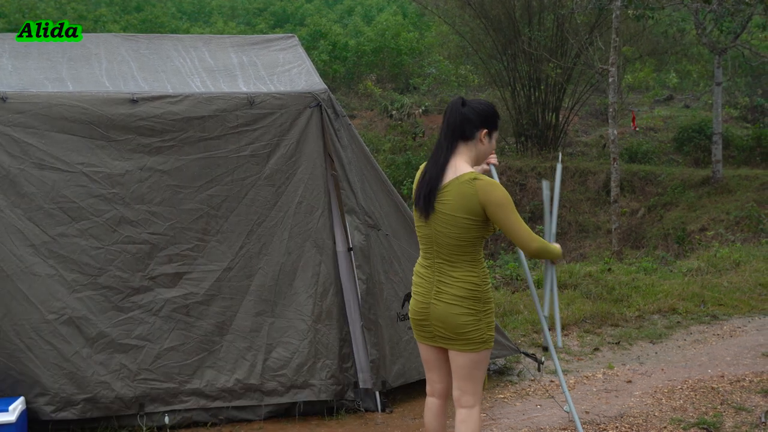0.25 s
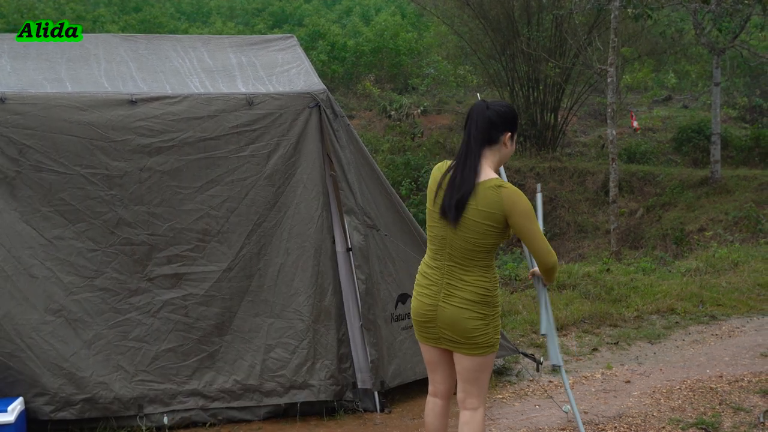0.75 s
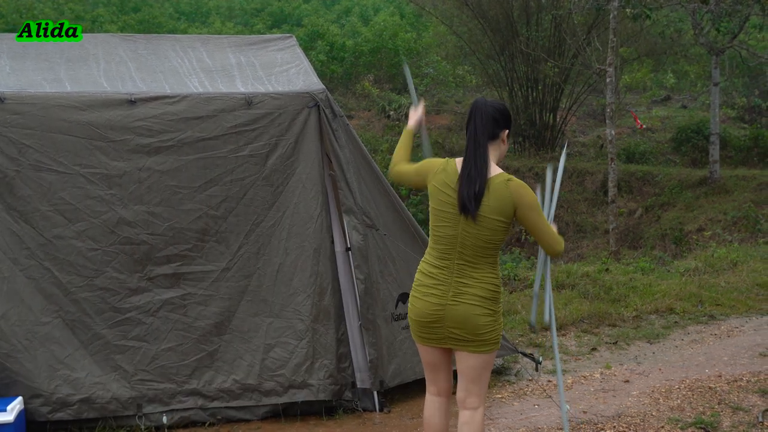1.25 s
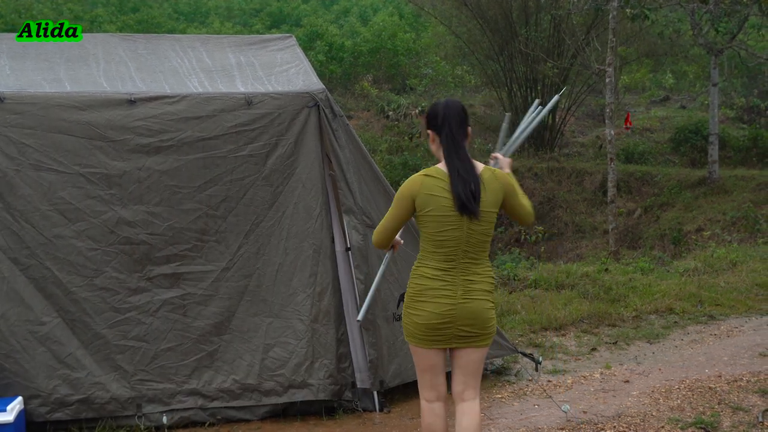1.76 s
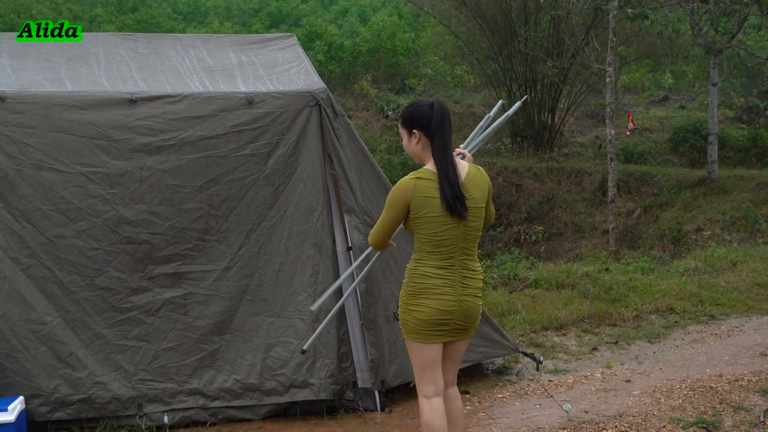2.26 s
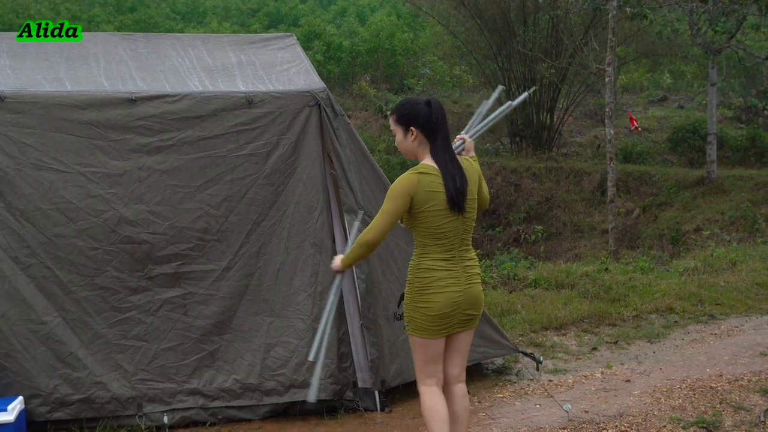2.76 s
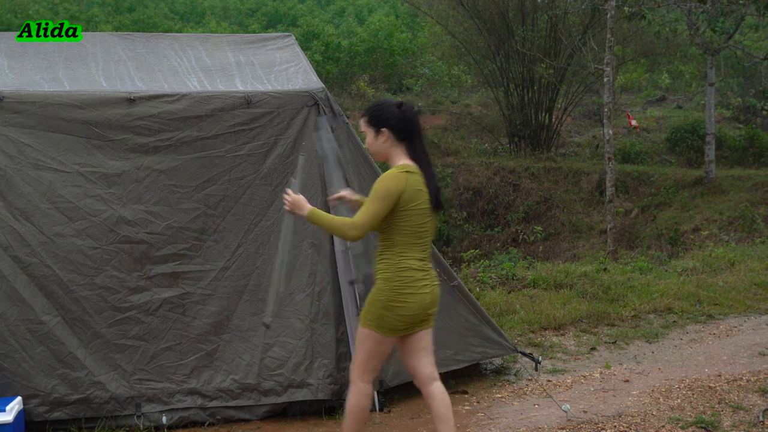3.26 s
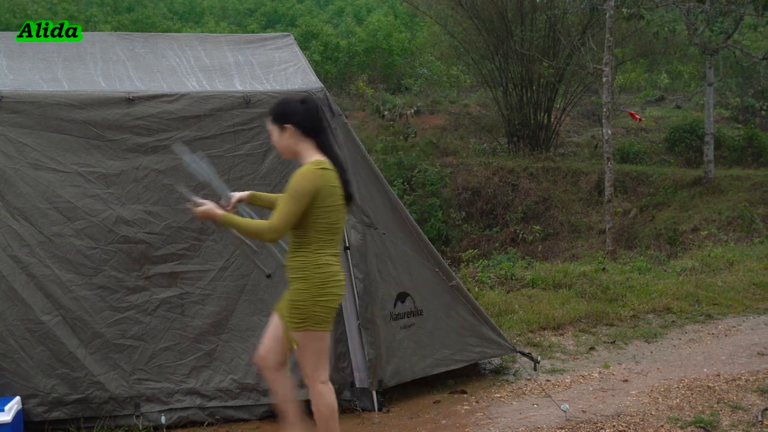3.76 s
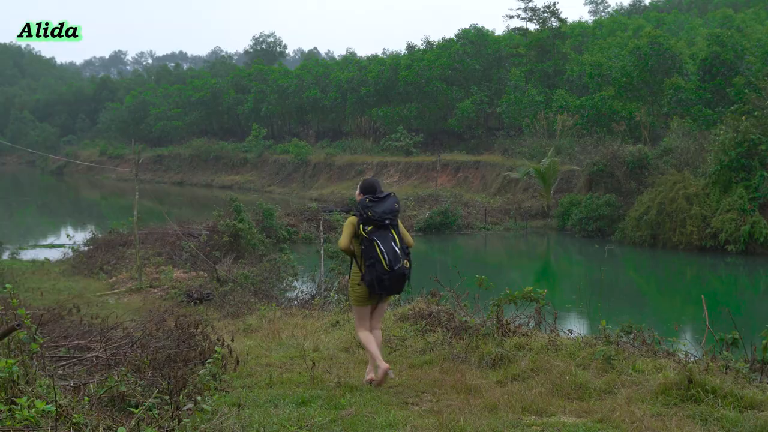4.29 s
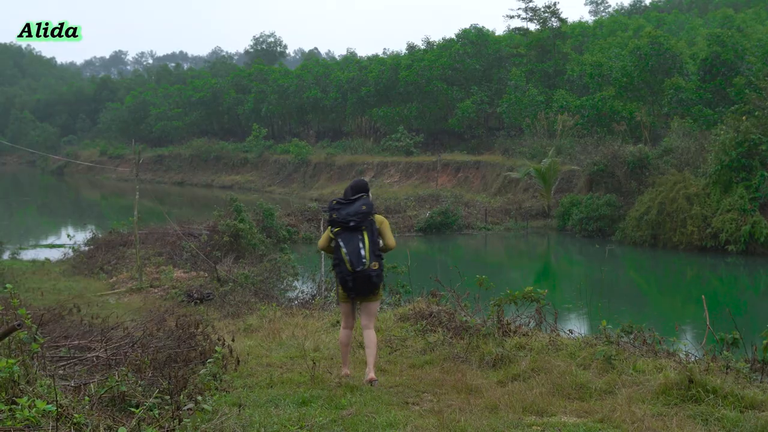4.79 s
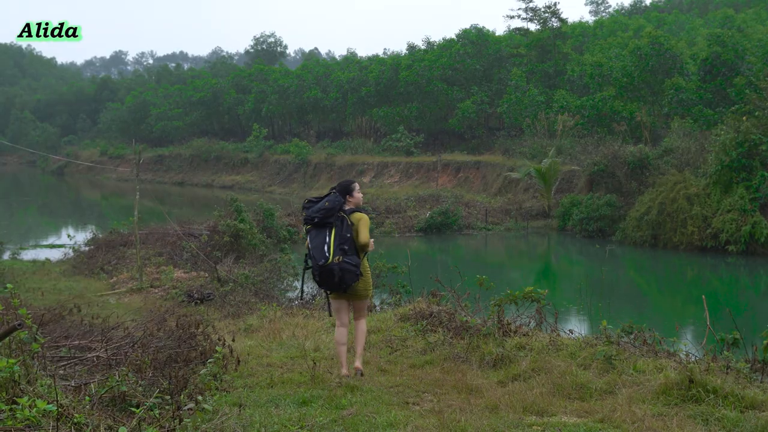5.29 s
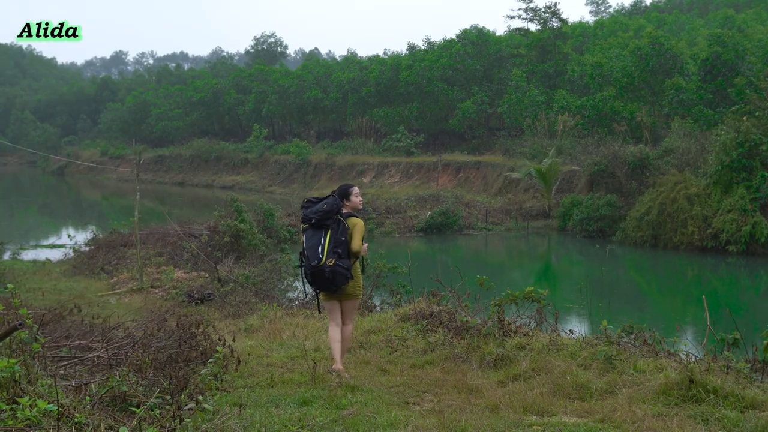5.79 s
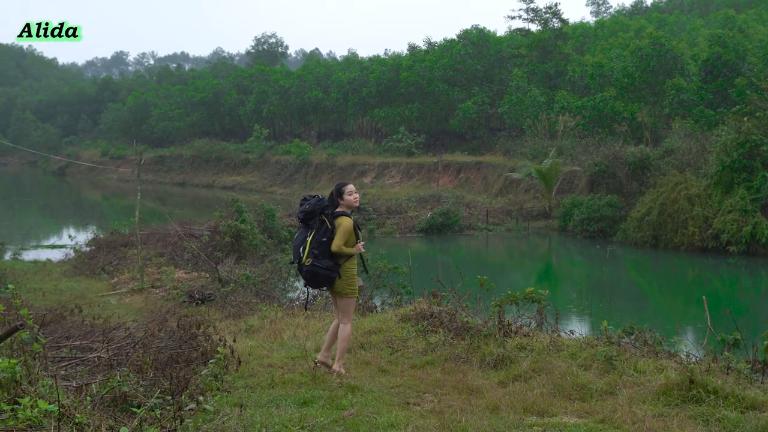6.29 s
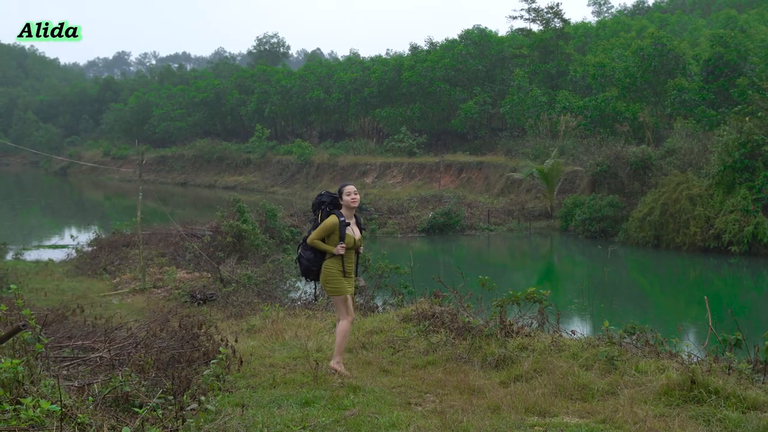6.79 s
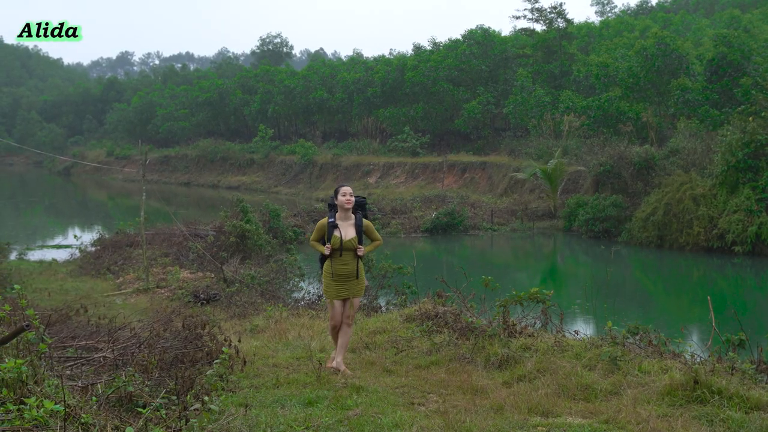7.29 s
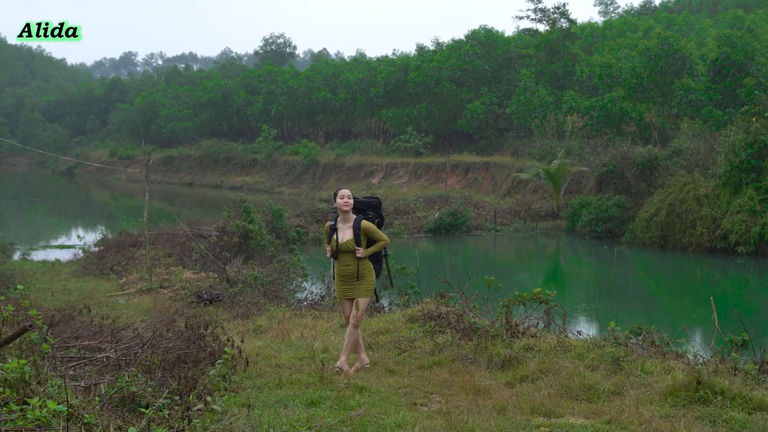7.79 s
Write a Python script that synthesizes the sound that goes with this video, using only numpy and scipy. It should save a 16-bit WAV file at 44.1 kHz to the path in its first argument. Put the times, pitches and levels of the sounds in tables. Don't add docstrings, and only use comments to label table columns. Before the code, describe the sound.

Bright, quickly damped clacks of hollow metal tubes over fine rain and a faint insect tone, then only soft footsteps and distant bird whistles.

```python
import sys
import numpy as np
from scipy import signal
from scipy.fft import rfft, irfft, next_fast_len
from scipy.io import wavfile

SR = 44100
rng = np.random.default_rng(int(sys.argv[2]) if len(sys.argv) > 2 else 0)


def natural_amplitude(level_db):
    exponent = np.asarray(level_db, float) / 20
    return 10 ** exponent


def output_pcm(signal):
    pcm = np.clip(np.atleast_2d(signal).T, -1, 1) * 32767
    wavfile.write(sys.argv[1], SR, np.round(pcm).astype(np.int16))


N = 354996


def rms_one(x):
    return x / np.sqrt(np.mean(x ** 2) + 1e-20)


def at_hz(points, hz):
    points_hz, values = np.transpose(points)
    return np.interp(np.log(hz), np.log(points_hz), values)


def drift(rate):
    r = np.exp(-80 * np.pi * rate / SR)
    slow = signal.lfilter([1], [1, -2 * r, r * r], rng.standard_normal(N // 40 + 2002))[2000:]
    return np.interp(np.arange(N) / 40, np.arange(len(slow)), rms_one(slow))


def resonate(x, peaks):
    out = 0
    for k, (hz, width, db) in enumerate(peaks):
        r = np.exp(-np.pi * width / SR)
        a = [1, -2 * r * np.cos(2 * np.pi * hz / SR), r * r]
        b = [(1 - r * r) / 2, 0, (r * r - 1) / 2]
        out = out + (-1) ** k * natural_amplitude(db) * signal.lfilter(b, a, x)
    return out


def coloured(x, db_at):
    hz = np.maximum(np.arange(x.shape[-1] // 2 + 1) * SR / x.shape[-1], 20)
    return irfft(rfft(x) * natural_amplitude(db_at(hz)), x.shape[-1])


def filtered(x, order, hz, kind):
    return signal.sosfilt(signal.butter(order, hz, kind, fs=SR, output="sos"), x)


def pair(alike, size):
    mid, side = rng.standard_normal((2, size))
    return np.sqrt((1 + alike) / 2) * mid + np.sqrt((1 - alike) / 2) * side * [[1], [-1]]


def add(out, sound, s, pan_db):
    i = round(s * SR)
    placed = sound * natural_amplitude([[pan_db / 2], [-pan_db / 2]])
    out[:, i:i + sound.shape[-1]] += placed[:, :N - i]


def damped(t, t60, after_s, held_t60=0.029):
    return natural_amplitude(-60 * t / t60 - 60 * np.maximum(t - after_s, 0) / held_t60)


# (time [s], left over right [dB])
PLACE = [(0, 1.5), (.7, -2.5), (.95, -2), (1.1, 0), (2.3, 0.5), (2.8, 1), (3.4, 1.5), (4.2, 3.5)]


def carried(s):
    return np.interp(s, *np.transpose(PLACE))


# (frequency [Hz], level [dB], free t60 [s])
LONG_TUBE = [(756, -23.5, 0.13), (1483.4, -6, 0.21), (2436, -4, 0.13), (3476, -3.5, 0.12),
             (4715, -9.5, 0.19), (6200, -13.5, 0.14), (7510, -6.5, 0.11), (9460, -6, 0.04),
             (10780, -11.5, 0.14)]
MIDDLE_TUBE = [(1670, -22, 0.36), (2530, -1.5, 0.069), (3960, -13.5, 0.12), (5120, -12.5, 0.45),
               (7200, -24, 0.22)]
SHORT_TUBE = [(1822, -9, 0.25), (2759, -8, 0.24), (2834, -19.5, 0.16), (5293, -8.5, 0.5), (8320, -15, 0.14)]
LOWEST_ORDERS = [2, 3, 4]
# (until time [s], contact point [share of length], middle tube level [dB],
# short tube level [dB], brightness [dB per octave])
GRIPS = [(.6, 0.228, -1, -5, 1.8), (.77, 0.393, 1, -12, -3.5), (.845, 0.37, 5.5, -17, -1),
         (.9, 0.388, -1, -1, -5), (1.0, 0.35, 1, -1, -5.5), (1.3, 0.038, 5, 7, 10), (1.8, 0.2, 5, -16, -1),
         (2.2, 0.214, 3, -1, 5), (2.5, 0.327, 4.5, 3, 0), (2.635, 0.22, -4, -8, 11),
         (2.75, 0.057, -15, -23, -1), (2.8, 0.079, 14, 8.6, -3), (3.1, 0.276, 6.5, 6, -1.5),
         (3.32, 0.477, 13, 10, 2), (3.6, 0.065, 5, -1.5, -5.5), (4.2, 0.464, -6, -14, -3.3),
         (4.24, 0.015, -2, 6.5, 1.9), (9.0, 0.13, -1, -5.5, 2.5)]


def struck_modes(s):
    _, place, middle_db, short_db, tilt_db = next(grip for grip in GRIPS if s < grip[0])
    tubes = (LONG_TUBE, MIDDLE_TUBE, SHORT_TUBE)
    modes = []
    for tube, lowest, tube_db in zip(tubes, LOWEST_ORDERS, (0, middle_db, short_db)):
        for order, (hz, db, t60) in enumerate(tube, lowest):
            shape = np.abs(np.cos(np.pi * ((order + 0.5) * place + 1 / 4))) + 0.053
            level_db = db + tube_db + tilt_db * np.log2(hz / 3000) + 20 * np.log10(shape)
            modes.append((hz, level_db, t60))
    return np.transpose(sorted(modes))[:, :, None]


# (frequency [Hz], density [dB per Hz])
CRACK_SPECTRUM = [(500, -52), (1050, -34), (1500, -6.5), (2450, -2.5), (3100, -14), (3600, -4.5),
                  (4400, -18), (5400, -2.5), (9000, -11.5), (13500, -27), (16000, -32)]
# (frequency [Hz], width [Hz], level [dB])
WALL_MODES = [(11100, 100, -31), (12530, 120, -31), (14560, 170, -33), (15300, 300, -32)]


def strike(s, peak_db, tilt_db, chatter_ms, free_ms, haze_db, rise_ms, held_t60=0.029):
    t = np.arange(6144) / SR
    early = t[:2048]
    hz, db, t60 = struck_modes(s)
    level_luck, turn_luck, pitch_luck, beat_luck = rng.standard_normal((4, len(hz), 1))
    chance, force = rng.random((2, 2048))

    ms = early * 1000
    weight = np.minimum(0.67 + ms / rise_ms, 1) * np.sqrt(np.clip(1 - ms / chatter_ms, 0, 1))
    contacts = (chance < 0.05) * (2 * force - 1) * weight
    contacts[0] = min(weight[0] + 1 / rise_ms, 1)

    hz = hz * (1 + 0.0045 * pitch_luck)
    caught = np.abs(np.exp(2j * np.pi * hz * early) @ contacts)[:, None] / np.linalg.norm(contacts)
    level = natural_amplitude(db + 0.5 * level_luck) / np.clip(caught, 0.4, 2)
    level = level * damped(t, np.clip(t60, 0.02, 0.4), free_ms / 1000, held_t60)
    level = level * (1 + 0.77 * np.cos(2 * np.pi * 0.00944 * hz * beat_luck * t))
    turn = 0.48 * hz / 3000 * turn_luck
    ring = (np.exp(1j * turn * [1, -1]).T @ (level * np.exp(2j * np.pi * hz * t))).imag
    ring = ring / np.std(ring[:, :300])

    white = pair(0.74, len(t))
    haze = coloured(white, lambda f: at_hz(CRACK_SPECTRUM, f) + tilt_db * np.log2(f / 3000))
    haze = rms_one(haze + natural_amplitude(18 + 2 * tilt_db) * resonate(white, WALL_MODES))
    snap = natural_amplitude(5 - 60 * t / 0.0042)
    haze = haze * (damped(t, 0.084, free_ms / 1000, held_t60) + snap)

    sound = signal.fftconvolve(ring + natural_amplitude(haze_db) * haze, contacts[None])
    return natural_amplitude(peak_db) * sound / np.max(np.abs(sound))


# (time [s], peak [dB], brightness [dB per octave], time until a hand damps [ms])
KNOCKS = [(0.179, -30, 5, 24), (0.2042, -27.5, 1, 69), (0.6969, -14, 9, 29), (0.706, -17, 0, 27),
          (0.7335, -20, 1, 46), (1.0566, -22, 10, 47), (2.289, -19, -0.5, 28), (2.328, -31.5, -6, 110),
          (2.6606, -18.5, 10, 66), (2.7675, -24.5, 7, 82), (2.8287, -10.5, 15, 44),
          (2.8355, -14.5, -0.5, 95), (3.298, -34, -1, 38), (3.3363, -36.5, -1, 43), (4.1655, -11, -4, 35),
          (4.231, -10.5, 2, 33), (4.2448, -18, -4, 86), (4.2756, -20.5, 0, 59)]


def knocks():
    out = np.zeros((2, N))
    for s, db, tilt_db, free_ms in KNOCKS:
        blow = strike(s, db, tilt_db, chatter_ms=10.5, free_ms=free_ms, haze_db=-4.5, rise_ms=1.5)
        add(out, blow, s, carried(s))
    return out


# (time [s], peak [dB], brightness [dB per octave])
TAPS = [(0.0894, -42, 5), (0.1032, -39, 4), (0.125, -38, 0), (0.1904, -28, -3), (0.3321, -39, 0),
        (0.645, -39, -4), (0.6963, -20.5, -2), (1.046, -3.5, 24), (1.0564, -7, 24), (1.909, -39, -8),
        (1.967, -39, 1), (2.028, -27, 3), (2.145, -41, -5), (2.642, -19.5, 2), (2.6543, -6, 18.5),
        (2.9867, -32.5, 0), (3.229, -38.5, -4), (3.4994, -39, 6), (3.51, -36.5, 5), (3.5488, -38, -1),
        (3.565, -39.5, -1), (4.2096, -13.5, -5)]


def taps():
    out = np.zeros((2, N))
    for s, db, tilt_db in TAPS:
        blow = strike(s, db, tilt_db, chatter_ms=1.3, free_ms=3.7, haze_db=5.0, rise_ms=0.3,
                      held_t60=0.023)
        add(out, blow, s, carried(s))
    return out


# (time [s], peak [dB], chatter [ms])
RATTLES = [(0.0044, -38, 54), (0.7777, -17.5, 27.6), (0.8495, -30, 16), (0.8669, -22.5, 38),
           (0.9099, -22.5, 31), (1.4366, -28, 9), (2.089, -32.5, 12), (2.559, -30.5, 50), (2.604, -28, 12),
           (2.825, -24, 6.5), (3.3817, -35.5, 21), (4.1791, -12.5, 23), (4.2141, -14, 28)]


def rattles():
    out = np.zeros((2, N))
    for s, db, chatter_ms in RATTLES:
        blow = strike(s, db, -1.4, chatter_ms, free_ms=28, haze_db=-2.5, rise_ms=6.0)
        add(out, blow, s, carried(s))
    return out


# (time [s], frequency [Hz], level [dB], t60 [s], time until damped [ms])
FREE_RINGS = [(0.044, 5100, -51.5, 0.44, 40), (0.23, 2525, -47.5, 0.29, 59), (0.25, 5150, -55, .4, 70),
              (0.435, 1590, -55, .55, 25), (0.48, 1525, -57.5, .32, 24), (0.698, 2422, -16.5, 0.076, 40),
              (0.699, 2530, -24, .1, 40), (0.78, 2500, -24.5, 0.091, 16), (0.782, 3985, -40, 0.15, 40),
              (0.912, 3990, -35.5, 0.18, 48), (0.7, 4010, -36, 0.15, 30), (2.292, 3880, -32, 0.069, 40),
              (2.302, 5316, -41, 0.55, 160), (2.605, 2450, -41, .5, 45), (2.658, 1465, -37, 0.45, 112),
              (2.656, 4715, -28, 0.09, 40), (2.656, 3460, -27, 0.11, 50), (2.708, 5085, -46.5, .79, 86),
              (2.831, 1543, -22.5, 0.1, 60), (2.834, 2765, -47, .6, 200), (2.835, 5062, -40, 0.8, 120),
              (2.836, 5340, -45, 0.6, 160), (2.96, 5068, -61, 3.0, 215), (2.836, 4700, -42, .3, 60),
              (.698, 1469, -30, .2, 40), (.784, 3500, -35, .2, 60), (1.066, 5230, -36, .2, 60),
              (1.436, 2550, -35, .15, 21), (4.166, 3478, -27.5, .4, 20), (4.16734, 1461, -24, .2, 16),
              (4.168, 7620, -36, .5, 30), (4.242, 3478, -31, .3, 46), (4.232, 5570, -29, .1, 30),
              (4.27, 5125, -37, .25, 45), (3.299, 2800, -37.5, 0.15, 33)]


def free_rings():
    out, t = np.zeros((2, N)), np.arange(18000) / SR
    for s, hz, db, t60, free_ms in FREE_RINGS:
        phase = 2 * np.pi * hz * t
        beat = 1 + 0.25 * np.sin(0.0048 * phase) + 0.2 * np.sin(0.017 * phase)
        shape = damped(t, t60, free_ms / 1000, held_t60=0.062) * np.minimum(t / 0.0015, 1)
        add(out, natural_amplitude(db) * beat * np.sin(phase) * shape, s, carried(s))
    return out


# (time [s], frequency [Hz], level [dB], t60 [s])
WOKEN = [(.205, 7750, -42, 0.14), (.205, 1460, -46, 0.3), (.698, 1475, -31, 0.21), (.698, 3506, -34, 0.17),
         (.742, 5370, -36, 0.1), (.698, 10850, -39, .085), (.7, 6240, -40, .3), (.782, 3520, -29, .12),
         (.785, 7950, -36, 0.082), (.78, 5669, -39, .1), (.779, 10900, -40, .08), (.868, 2460, -32, .1),
         (.875, 6078, -38, .095), (.868, 3480, -37, .07), (.915, 2432, -31.5, 0.21),
         (1.047, 10850, -30, .12), (1.056, 8250, -20, .04), (1.047, 1574, -32, 0.055),
         (1.047, 14480, -40, .12), (1.058, 11150, -43, .4), (1.058, 7644, -37, .18), (1.062, 6130, -44, .2),
         (1.437, 1580, -39, 0.066), (1.437, 3550, -44, 0.08), (2.09, 2520, -47, .07),
         (2.09, 15100, -46, .04), (2.29, 1744, -30.5, 0.064), (2.289, 2697, -31, 0.15),
         (2.288, 15070, -43, .045), (2.329, 1790, -43.5, .2), (2.661, 9135, -23, .073),
         (2.661, 11000, -21, 0.05), (2.661, 12610, -28, .08), (2.661, 8220, -33, .12),
         (2.661, 2390, -40.5, .3), (2.832, 9582, -18, 0.061), (2.83, 3970, -18.5, .05),
         (2.836, 14360, -35, .085), (2.84, 2360, -28, .18), (3.336, 2364, -41.5, 0.14),
         (4.187, 1660, -30, .1), (4.166, 2360, -30, 0.13), (4.17, 9179, -42, .25), (4.17, 7560, -41, .25),
         (4.167, 14780, -37, .2), (4.243, 2520, -27, 0.15), (4.242, 1790, -34, .2), (4.245, 6150, -40, 0.2),
         (4.232, 14720, -35, .1)]


def woken_modes():
    out, t = np.zeros((2, N)), np.arange(6000) / SR
    knots = np.arange(100) * 0.004
    for s, hz, db, t60 in WOKEN:
        turn_luck, phase_luck, level_luck = rng.standard_normal((3, 100))
        turn = 0.39 * hz / 3000 * turn_luck[0] * np.array([[1], [-1]])
        phase = 2 * np.pi * hz * t + 0.6 * np.interp(t, knots, phase_luck) + turn
        shape = natural_amplitude(db + 4.0 * np.interp(t, knots, level_luck)) * damped(t, t60, after_s=0.045)
        add(out, shape * np.minimum(t / 0.0019, 1) * np.sin(phase), s, carried(s))
    return out


# (start time [s], full speed time [s], pops free time [s],
# level [dB], pitch of its sleeve [ratio])
SLIDES = [
    (0.983, 1.034, 1.048, -21, 1.02),
    (2.543, 2.557, 2.4, -46.5, 0.86),
    (2.598, 2.645, 2.6465, -18, .992),
]
# (frequency [Hz], width [Hz], level [dB])
SLEEVE = [(2510, 75, -1.5), (5930, 250, -10.5), (7540, 25, -6), (7650, 66, 9), (8880, 230, -5),
          (9120, 77, 3.5), (10160, 330, -10), (14900, 500, -20)]


def slides():
    out, t = np.zeros((2, N)), np.arange(6000) / SR
    for s, full, free, db, pitch in SLIDES:
        grit = pair(0.85, len(t)) * natural_amplitude(1.9 * np.minimum(rng.exponential(1, len(t)), 4))
        scrape = coloured(grit, lambda f: 12 * np.log2(np.minimum(f / 2500, 1)))
        tone = resonate(grit, np.array(SLEEVE) * [pitch, 1, 1]) + natural_amplitude(-23.0) * scrape
        rise_db = -442 * np.maximum(full - s - t, 0)
        stop_db = -2500 * np.maximum(t + s - free, 0)
        shape = natural_amplitude(db + rise_db + stop_db) * np.clip(t / 0.013, 0, 1)
        add(out, rms_one(tone) * shape, s, 3.5)
    return out


# (time [s], level [dB])
SWING_SPEED = [(3.67, -63), (3.696, -51.5), (3.786, -41), (3.866, -53.5), (3.902, -41), (3.998, -41),
               (4.054, -54.5), (4.114, -48.5), (4.16, -56), (4.2, -64.5)]
# (frequency [Hz], width [Hz], level [dB])
AIR_COLUMN = [(460.7, 23.4, 1), (404, 50, -10)]
OVERTONES = [(684, 180, -4), (905, 46, 2.5), (1024, 69, 0.5), (1223, 160, -2), (1345, 45, 3.5),
             (1530, 200, -5)]
EDGE = [(2400, 350, -3), (2800, 210, 2.5), (3150, 260, -3.5)]
BITE = [(1050, 260, 1.5), (1500, 200, 3), (1970, 260, -2)]


def blown(peaks):
    wind = resonate(resonate(pair(0.88, SR), peaks), peaks) * natural_amplitude(1.36 * drift(36)[:SR])
    return rms_one(filtered(wind, 3, [330, 3400], "band"))


def swing():
    out, since = np.zeros((2, N)), np.arange(SR) / SR
    start = SWING_SPEED[0][0]
    hoot_db = np.interp(since + start, *np.transpose(SWING_SPEED))
    hoot = natural_amplitude(hoot_db) * blown(AIR_COLUMN)
    short_hoot = natural_amplitude(hoot_db - 0.5 - 22 * since) * blown([(524, 32, 0)])
    overtones = natural_amplitude(-46 + 0.41 * (hoot_db + 45.5)) * blown(OVERTONES)
    edge = natural_amplitude(-55.5 + 0.33 * (hoot_db + 47) - 27 * since) * blown(EDGE)
    read = SR / 10 + np.cumsum(1 + 0.2 * np.exp(-np.maximum(since - 0.02, 0) / 0.031))
    rush = np.array([np.interp(read, np.arange(SR), side) for side in blown(BITE)])
    peak_s = 0.037
    slope = 110 * np.where(since < peak_s, 6, 1)
    rush = natural_amplitude(-44 - slope * np.abs(since - peak_s)) * rush
    fade_in = np.clip(since / 0.039, 0, 1)
    add(out, fade_in * (hoot + short_hoot + overtones + edge + rush), start, 5.0)
    return out


# (time [s], hold [s], level [dB], brightness [dB per octave])
RUSTLE = [(0.0, 0.035, -65, 4), (0.044, 0.5, -59.5, -20), (0.1, 0.037, -59, 0.5), (1.06, .01, -61, 9),
          (1.2, 0.85, -65, -11), (2.358, 0.14, -56.5, -14), (2.945, .01, -53.5, -1.5),
          (3.2, 0.15, -63, -13), (3.344, 0.037, -50.5, -0.5), (3.486, 0.064, -57.5, -16),
          (3.688, .06, -56.5, -14), (4.717, 0.65, -68.5, -3), (6.55, .1, -70, -3)]


def rustle():
    grains = pair(0.71, N) * natural_amplitude(3.1 * np.minimum(rng.exponential(1, N), 4) + 2.2 * drift(39))
    dull = rms_one(filtered(grains, 2, [900, 4500], "band"))
    bright = rms_one(filtered(grains, 2, [4500, 14000], "band"))
    dull_gain, bright_gain, t = 0, 0, np.arange(N) / SR
    for s, hold, db, tilt_db in RUSTLE:
        shape = np.clip((t - s) / 0.023, 0, 1) * natural_amplitude(db - 60 * np.maximum(t - s - hold, 0) / 0.57)
        dull_gain = dull_gain + shape
        bright_gain = bright_gain + natural_amplitude(2 * tilt_db) * shape
    return dull_gain * dull + bright_gain * bright


# (time [s], peak [dB], frequency [Hz])
CLICKS = [(.027, -38.5, 5000), (.064, -43, 13000), (.134, -37, 3000), (1.931, -48, 8500),
          (1.994, -46, 8500), (2.024, -33, 9000), (2.048, -44, 10000), (2.15, -39, 3500),
          (2.312, -38, 12500), (2.387, -46, 12000), (2.418, -42, 2000), (2.458, -40, 5000),
          (2.466, -42, 2000), (2.6603, -13, 10000), (1.0468, -16, 9000), (1.0575, -18, 9000),
          (.7085, -21, 6000), (2.599, -31, 7500), (2.936, -42, 2500), (3.343, -47, 11000),
          (3.385, -40, 14000), (3.391, -38, 13000), (3.395, -39, 5000), (3.405, -42, 8000),
          (3.458, -40, 4000), (3.527, -40.5, 3000), (3.644, -46, 9000), (2.6562, -13, 8000),
          (2.65, -25, 7500), (2.644, -20, 7600), (2.602, -31, 7000), (4.2345, -19, 6000),
          (4.166, -24, 12000), (4.21, -24, 12000), (2.2872, -33, 5000), (2.29, -30, 7000),
          (2.2955, -27, 4500), (2.299, -29, 6500), (2.304, -31, 6000), (.6963, -24, 5000),
          (1.029, -25, 7700)]


def clicks():
    out, t = np.zeros((2, N)), np.arange(1024) / SR
    for s, peak_db, hz in CLICKS:
        burst = rms_one(resonate(pair(0.7, len(t)), [(hz, 0.6 * hz, 0)]))
        add(out, natural_amplitude(peak_db - 1 - 60 * t / 0.0093) * burst, s, 0.5)
    return out


# (time [s], peak [dB], frequency [Hz], ring [ms], left over right [dB])
TICKS = [(0.3099, -31, 520, 8.4, 9), (2.395, -33, 1900, 9, 0.5), (2.391, -39, 2010, 14, -0.5),
         (2.474, -28.5, 1940, 7.6, 0.5), (2.48, -38, 1746, 14, -2), (2.495, -40, 1533, 13, -0.5),
         (2.523, -34.5, 1880, 9.3, -0.5), (2.529, -41, 2000, 10, 0), (3.703, -39, 509, 13, 4),
         (3.717, -40, 530, 14, 4), (4.166, -32, 850, 40, 1), (4.21, -24, 1080, 30, 1),
         (4.232, -31, 1050, 30, 1), (4.629, -43, 1882, 11, -1.0), (5.699, -54, 550, 12.0, -1.0),
         (6.263, -44, 540, 16, -0.5), (6.623, -44, 1970, 9.5, -7)]


def ticks():
    out, t = np.zeros((2, N)), np.arange(4410) / SR
    for s, peak_db, hz, ring_ms, pan_db in TICKS:
        noise = resonate(rng.standard_normal(len(t)), [(hz, 0.33 * hz, 0)])
        puff = np.sin(2 * np.pi * hz * t) + 2.4 * noise
        shape = natural_amplitude(peak_db - 60000 * t / ring_ms) * np.minimum(t / 0.00044, 1)
        add(out, shape * puff, s, pan_db)
    return out


# (time [s], peak [dB])
CRACKLES = [
    (4.143, -41),
    (3.712, -38),
    (4.634, -40.5),
    (4.712, -42.5),
    (5.1, -48),
]


def crackles():
    out, t = np.zeros((2, N)), np.arange(4410) / SR
    for s, peak_db in CRACKLES:
        burst = resonate(rng.standard_normal(len(t)), [(4800, 3800, 0.5)])
        add(out, natural_amplitude(peak_db - 60 * t / 0.022) * burst, s, 0)
    return out


# (middle time [s], length [s], level [dB], frequency [Hz])
SWISHES = [
    (4.8, 0.18, -63, 1840),
    (4.96, .16, -62.5, 1750),
    (5.24, 0.13, -62.5, 1780),
    (5.7, .05, -63, 1750),
    (6.15, 0.11, -66, 1710),
    (6.6, .2, -67, 2100),
]


def swishes():
    out = np.zeros((2, N))
    for s, length, db, hz in SWISHES:
        share = np.linspace(0, 1, int(length * SR))
        grass = rms_one(resonate(pair(0.8, 12000), [(hz, 190, 0)]))[:, :len(share)]
        add(out, natural_amplitude(db) * np.sin(np.pi * share) * grass, s - length / 2, 0)
    return out


# (time of the last note [s], level [dB])
PHRASES = [
    (6.497, -58),
    (6.917, -57),
]


def birds():
    out, t = np.zeros((2, N)), np.arange(4410) / SR
    length = 0.026
    share = np.clip(t / length, 0, 1)
    hz = 4680 + (4000 - 4680) * share
    note = np.sin(np.pi * share) * np.sin(2 * np.pi * np.cumsum(hz) / SR)
    for s, db in PHRASES:
        for k in range(3):
            add(out, natural_amplitude(db - 3 * k) * note, s - 0.048 * k - length / 2, 0)
    return out


# (frequency [Hz], density [dB per Hz])
RAIN = [(59, -52), (100, -15), (129, -10.5), (166, -8.5), (595, 0.5), (1310, -3.5), (4200, -8), (5650, -11),
        (6840, -4), (7940, -12.5), (14100, -15), (16000, -40.5)]
# (time [s], level [dB])
RAIN_LEVEL = [(0.0, -52.5), (3.76, -52.5), (3.9, -51), (4.5, -54.5), (8.05, -54.5)]
# (frequency [Hz], likeness [0-1])
LIKENESS = [(60, 0.985), (110, 0.91), (200, 1), (380, 0.53), (700, 0.17), (1300, 0.03), (4400, 0.09),
            (15000, 0.079)]


def rain():
    def alike(f):
        return np.clip(at_hz(LIKENESS, f), 0, 0.99)

    mid, side = rng.standard_normal((2, next_fast_len(N)))
    mid = coloured(mid, lambda f: at_hz(RAIN[:-1], f) + 10 * np.log10(1 + alike(f)))[:N]
    side = coloured(side, lambda f: at_hz(RAIN[:-1], f) + 10 * np.log10(1 - alike(f)))[:N]
    level_db = np.interp(np.arange(N) / SR, *np.transpose(RAIN_LEVEL))
    return natural_amplitude(level_db - 1.0 + 0.25 * drift(11)) * rms_one(mid + side * [[1], [-1]])


def insects():
    band = [(6860, 240, 0)]
    wings = rms_one(resonate(resonate(pair(0.033, N), band), band))
    return natural_amplitude(-67.5 + 0.52 * drift(1.3) + 1.0 * drift(60)) * wings


def far_traffic():
    return natural_amplitude(-87.5 + 1.8 * drift(1.5)) * rms_one(resonate(pair(0.98, N), [(62, 7.2, 0)]))


def echoes(x):
    t = np.arange(11025) / SR
    tail = pair(0.79, len(t)) * natural_amplitude(-60 * t / 0.28) * (t > 0.006)
    tail = tail / np.sqrt(np.sum(tail ** 2, axis=1, keepdims=True))
    return natural_amplitude(-14) * signal.fftconvolve(x, tail, axes=1)[:, :N]


def narrowed(x):
    mid = (x[0] + x[1]) / 2
    side = filtered(x[0] - x[1], 1, 1700, "high") / 2
    return mid + natural_amplitude(0.5) * side * [[1], [-1]]


def late(x):
    k = np.arange(-24, 25)
    return np.array([x[0], np.convolve(x[1], np.sinc(k - 0.47) * np.hanning(len(k)), "same")])


def scene():
    metal = narrowed(knocks() + taps() + rattles() + free_rings() + woken_modes() + slides())
    poles = filtered(metal, 4, 760, "high") + swing()
    poles = signal.lfilter(*signal.iirnotch(4360, 14, fs=SR), poles)
    poles_on = np.clip((4.328 - np.arange(N) / SR) / 0.0017, 0, 1)
    handling = rustle() + clicks() + ticks() + crackles() + swishes() + birds()
    near = filtered((poles + echoes(poles)) * poles_on + handling, 2, 250, "high")
    return near + rain() + insects() + far_traffic()


def band_limit(x):
    return signal.sosfilt(signal.butter(12, 16150, fs=SR, output="sos"), x)


def record(dry):
    top_cut = signal.ellip(8, 0.5, 60, 16000, fs=SR, output="sos")
    heard = signal.sosfilt(top_cut, late(dry))
    mix = 0.73 * np.tanh(heard / 0.77)
    return band_limit(mix)


dry = scene()
out = record(dry)
output_pcm(out)
```